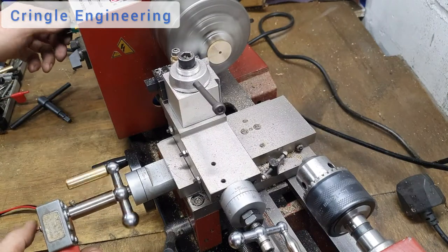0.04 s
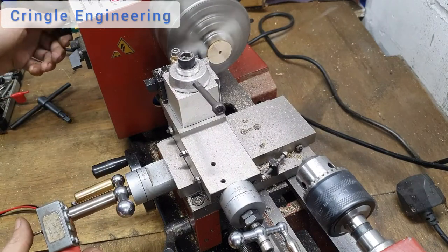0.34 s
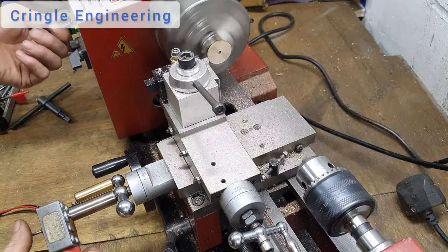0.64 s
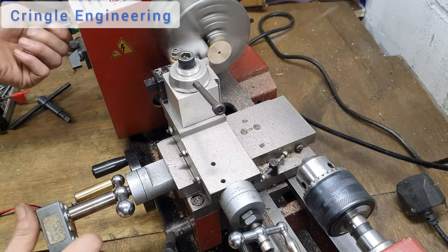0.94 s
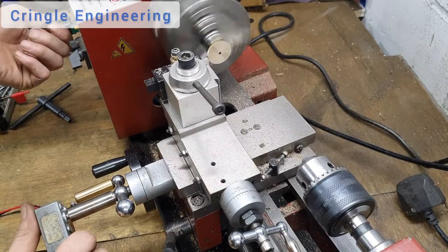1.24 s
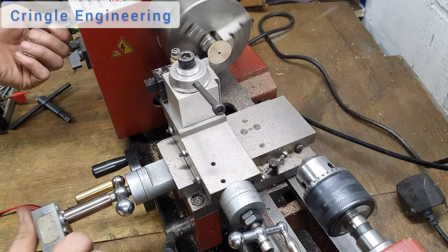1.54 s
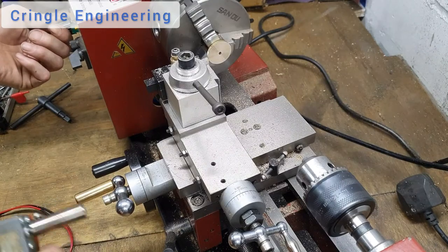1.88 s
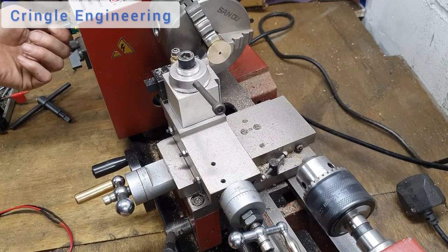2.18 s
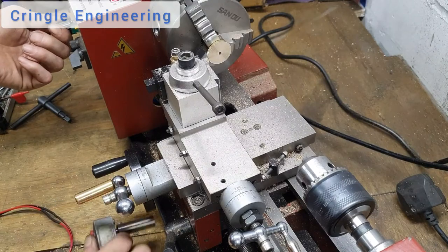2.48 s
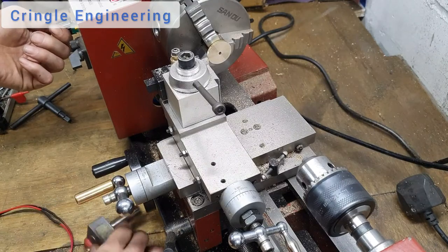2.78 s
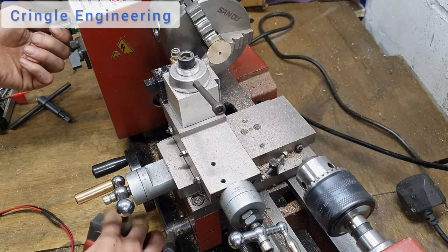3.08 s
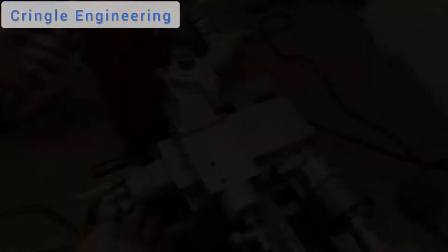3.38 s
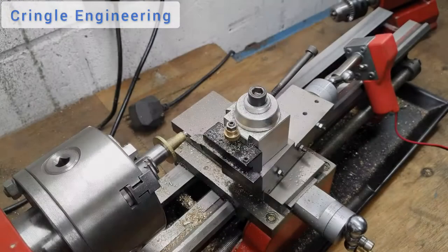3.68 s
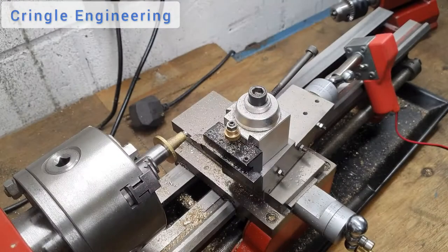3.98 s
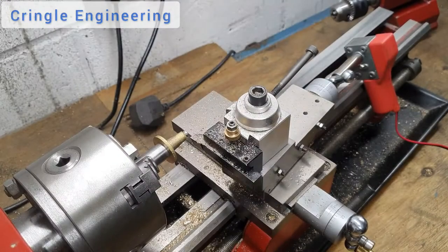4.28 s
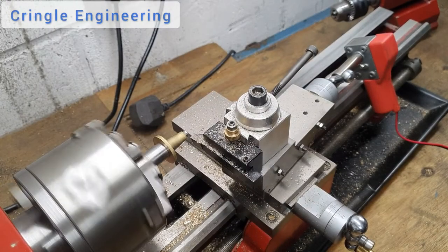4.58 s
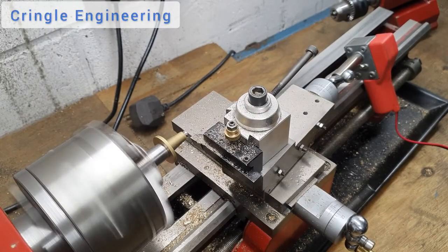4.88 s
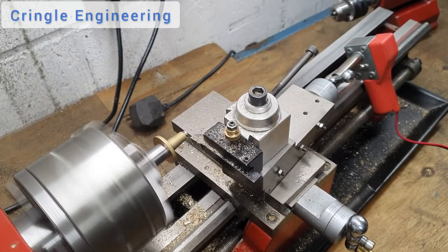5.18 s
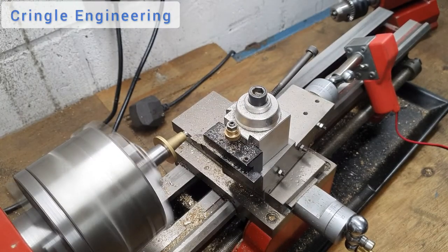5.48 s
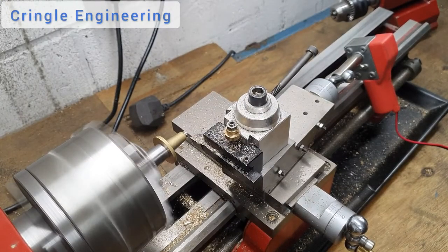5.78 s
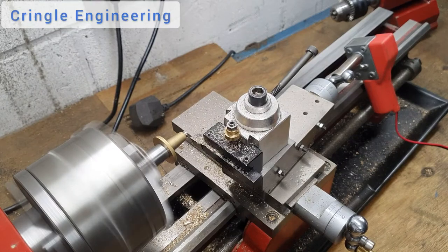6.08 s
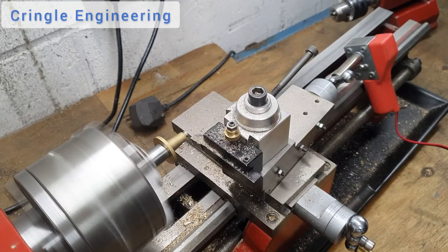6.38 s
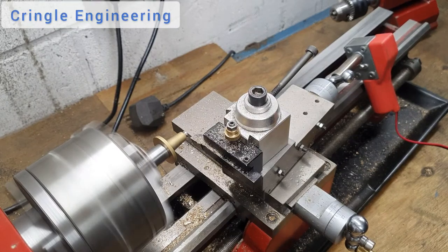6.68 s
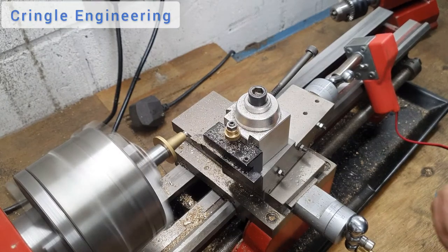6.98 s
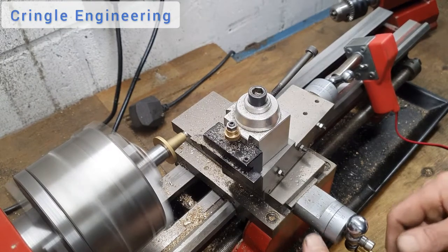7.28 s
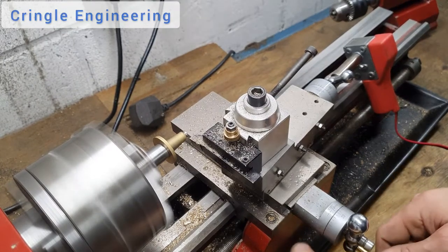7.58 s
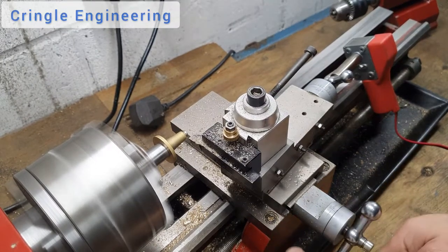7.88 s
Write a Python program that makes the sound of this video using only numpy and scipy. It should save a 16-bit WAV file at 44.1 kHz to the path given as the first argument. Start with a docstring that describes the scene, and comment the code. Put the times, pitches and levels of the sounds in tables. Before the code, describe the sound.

Close up in a workshop, the loose gears of a small lathe whirr and clack as they slow to rest. A tool thuds onto the wooden bench and is shoved along with faint squeaks. The sound dips away and returns, then the lathe starts with a click and a low electric hum, its gear whine climbing in stages and holding steady over a dense metallic rattle.

```python
"""The gear train of a small bench lathe coasts to rest, its teeth clacking across their backlash.
A tool is put down and shoved along the wooden bench. The sound fades out and in, now beside the
headstock: the switch snaps, the motor growls at twice mains frequency, and the gears speed up in steps.
Periodic tooth contact makes a steady whine; tooth impacts excite the housing into a dense rattle."""
import sys
import numpy as np
from scipy import signal
from scipy.fft import rfft, irfft, next_fast_len
from scipy.io import wavfile
from scipy.ndimage import uniform_filter1d, map_coordinates

SR = 44100
rng = np.random.default_rng(int(sys.argv[2]) if len(sys.argv) > 2 else 0)


def wav_record(signal):
    """Record a signal, one row per channel, as 16-bit PCM in the file named by sys.argv[1]."""
    frames = np.transpose(np.atleast_2d(signal))
    bounded = np.clip(frames, -1, 1)
    # unit amplitude maps onto the largest positive 16-bit level
    quanta = np.round(bounded * 32767).astype(np.int16)
    wavfile.write(sys.argv[1], SR, quanta)


N = 354563
TIME = np.arange(N) / SR
TEETH = 30
ON_S, MOVE_S = 4.478, 3.386  # the switch closes; the listener moves from tool post to headstock

def amp(db):
    """Decibels as an amplitude ratio."""
    return 10 ** (np.asarray(db) / 20)

def unit(x):
    """Normalisation: the mean of the channels gets rms 1."""
    return x / np.sqrt(np.mean(np.atleast_2d(x).mean(0) ** 2) + 1e-20)

def along(points, hz):
    """Interpolation of (Hz, value) points on a log frequency axis."""
    freqs, values = np.transpose(points)
    return np.interp(np.log(hz + 1), np.log(freqs + 1), values)

def noise():
    """Two uncorrelated white noises."""
    return rng.standard_normal((2, N))

def wobble(rate):
    """Smooth random modulation with rate knots a second."""
    coarse = TIME[::16]
    knots = rng.standard_normal(int(N * rate / SR) + 4)
    return np.interp(TIME, coarse, map_coordinates(knots, [coarse * rate]))

def wavering(hz, depth, rate, start=0):
    """A sine with random phase modulation, depth in radians."""
    return np.sin(2 * np.pi * hz * (TIME - start) + depth * wobble(rate))

def dying(s, db, t60):
    """Exponential decay after a blow."""
    return amp(db - 60 * np.abs(TIME - s) / t60) * np.clip((TIME - s) / 0.0026, 0, 1)

def swell(s, db, half):
    """A Gaussian rise and fall."""
    return amp(db) * np.exp(-.5 * ((TIME - s) / half) ** 2)

def filtered(x, response):
    """Linear filtering: the spectrum times a frequency response."""
    size = next_fast_len(N + SR // 2)
    return irfft(rfft(x, size) * response(np.fft.rfftfreq(size, 1 / SR)), size)[..., :N]

def dulled(x, edge_hz):
    """Low-pass filtering, 36 dB an octave."""
    return filtered(x, lambda hz: 1 / (1 + (hz / edge_hz) ** 6))

def gain(spectrum, modes, hz):
    """Resonance: each mode adds a Lorentzian peak or dip in dB to a broad spectrum."""
    lift_db = sum(db / (1 + ((hz - centre) / (width / 2)) ** 2) for centre, width, db in modes)
    return amp(along(spectrum, hz) + lift_db)

# Stereo images, two lists each. Each row of the first: frequency in Hz, left minus right in dB.
# Each row of the second: frequency in Hz, coherence from 0 to 1.
AT_TOOL_POST = ([(100, -0.5), (500, 0.5), (1000, -5), (2400, -9), (6000, -22), (8000, -32), (12000, -13)],
                 [(100, .99), (300, 1), (1000, 0.2), (3000, 0.073)])
AT_HEADSTOCK = ([(100, -2), (250, -2.5), (600, -2), (1000, 1), (1250, -8), (1800, -5), (2100, -9),
                 (2700, -7.5), (4200, -12.5), (6300, -20.5), (8000, -21), (9200, -20), (11500, -8.5),
                 (15000, -17)], [(100, 0.38), (300, 0.91), (600, 0.37), (1200, 0.035), (2500, 0.037)])
CENTRED = ([(100, 0.0034), (5000, 0.008)], [(100, 0.99), (500, 0.63), (2000, 0.14), (6000, .2)])
def heard(pair, spectrum, place, modes=()):
    """Partial coherence: two unrelated signals are coloured and blended into left and right."""
    balance, coherence = place
    def blend(hz):
        angle = np.arccos(np.clip(along(coherence, hz), 0, 1)) / 2
        return gain(spectrum, modes, hz) * np.array([np.cos(angle), np.sin(angle)])
    def lean(hz):
        left = amp(along(balance, hz))
        middle = np.sqrt(1 + left ** 2 + 2 * left * np.clip(along(coherence, hz), 0, 1))
        return np.array([left, np.ones_like(left)]) / middle
    mid, side = filtered(pair, blend)
    return unit(filtered(np.array([mid + side, mid - side]), lean))

def from_right(pair, lag_ms=0.31):
    """Path difference: sound from the right reaches the left channel later."""
    return filtered(pair, lambda hz: np.exp(-2j * np.pi * hz * np.array([[lag_ms / 1000], [0]])))

def strikes(cycles, sizes, scatter):
    """An impulse train: one blow a cycle, jittered by a share of a cycle."""
    k = np.arange(1, int(cycles[-1]))
    at = np.interp(k + scatter * rng.standard_normal(len(k)), cycles, np.arange(N))
    return np.bincount(at.astype(int), sizes(k), N)[:N]

def uneven(k, spread_db):
    """Log-normal strengths for the blows k, limited to two deviations."""
    return amp(spread_db * np.clip(rng.standard_normal(len(k)), -2, 2))

def ringing(blows, t60, spots=5):
    """Convolution: each spot struck has its own impulse response, a dense cluster of modes."""
    t = np.arange(SR // 8) / SR
    spot = rng.integers(spots, size=N)
    paths = rng.standard_normal((spots, 2, len(t))) * amp(-60 * t / t60)
    return unit(sum(signal.oaconvolve((blows * (spot == k))[None], paths[k], axes=1)[:, :N]
                    for k in range(spots)))

# Room air, one spectrum for each listening position. Each row: frequency in Hz, relative level in dB.
AIR_SPECTRA = ([(80, -6), (140, 2), (200, 3.5), (300, -3.5), (400, 1.5), (620, -10), (1030, -14),
               (2000, -22.5), (3500, -29), (6300, -40.5), (7500, -58), (15000, -60)], [(90, -2.5),
               (165, -6), (200, -1.5), (330, 0), (450, -0.5), (620, -13.5), (950, -13.5), (2000, -22.5),
               (3500, -30), (4500, -37.5), (6300, -40.5), (7500, -62), (15000, -63)])
def room_air():
    """Ambient noise: a steady hiss at the tool post, then another beside the headstock."""
    levels = (TIME < MOVE_S) * amp(-47.5), (TIME >= MOVE_S) * amp(-49.5)
    return sum(level * heard(noise(), colour, CENTRED) for level, colour in zip(levels, AIR_SPECTRA))

# The rumble's spectrum. Each row: frequency in Hz, relative level in dB.
RUMBLE_SPECTRUM = [(20, -12), (40, -16.5), (62, 5.5), (80, -0.5), (100, 1.5), (116, -7.5), (135, -25.5),
                   (200, -49), (400, -74.5)]
# Its swells. Each row: centre in seconds, level in dB, half length in seconds.
RUMBLE_SWELLS = [(1.302, -44, 0.42), (2.427, -39.5, 0.17), (4.046, -41, 0.52), (4.95, -36.5, 0.37)]
def bench_rumble(rest_db=-45, shake_db=-54.5):
    """Structure-borne sound: the motor's shaking adds in power to a low rumble in the bench."""
    shake = amp(shake_db) * motor_load() ** 1.3
    level = np.sqrt(amp(rest_db) ** 2 + shake ** 2 + sum(swell(*row) ** 2 for row in RUMBLE_SWELLS))
    return level * amp(1.1 * wobble(4.02)) * heard(noise(), RUMBLE_SPECTRUM, CENTRED)

# Modes of a hollow object. Each row: frequency in Hz, level in dB, 60 dB decay time in seconds.
HOLLOW_MODES = [(482, -35, .2), (590, -39, .16), (704, -34, 0.098), (875, -42, .08)]
def hollow_knock(s=3.058):
    """Free vibration: something hollow is bumped and its damped modes ring briefly."""
    return sum(dying(s, db, t60) * wavering(hz, 0.47, 120, start=s) for hz, db, t60 in HOLLOW_MODES)

# Blows on the bench. Each row: start in seconds, level in dB, main mode in Hz, relative click in dB.
TOOL_BLOWS = [(2.64, -20.5, 285, -18), (2.667, -17.5, 231.7, -13), (2.689, -18, 148, -28),
              (2.726, -30, 124, -31), (2.794, -31, 105, -9.5), (2.895, -31, 158, -17),
              (2.959, -30, 138, -20), (3.1, -33.5, 258, -28), (3.143, -40, 342, -15)]
# The click's spectrum. Each row: frequency in Hz, relative level in dB.
CLICK_SPECTRUM = [(150, -8), (500, 12), (1200, 7.5), (2800, 0.5), (4500, -14), (6700, -22), (7600, -31),
                  (15000, -43)]
def tool_knocks(t60=0.18, side_modes_db=-8.0):
    """Impact excitation: each blow of the tool gives a hard click and a thud from the boards' modes."""
    thud, click = np.zeros(N), np.zeros(N)
    for s, db, hz, click_db in TOOL_BLOWS:
        phase = 2 * np.pi * hz * (TIME - s)
        side_modes = amp(side_modes_db) * (np.sin(1.37 * phase) + np.sin(0.6 * phase))
        thud += dying(s, db, t60) * (np.sin(phase) + side_modes)
        click += dying(s, db + click_db, t60=0.084)
    return thud + click * heard(noise(), CLICK_SPECTRUM, AT_TOOL_POST)

# Shoves of the tool. Each row: centre in seconds, level in dB, half length in seconds.
TOOL_SHOVES = [(2.42, -49.5, 0.18), (2.75, -41, 0.06), (2.95, -41, 0.043), (3.227, -43, 0.13)]
# The scrape's spectrum. Each row: frequency in Hz, relative level in dB.
SCRAPE_SPECTRUM = [(70, -24), (150, 13), (300, 11), (600, -3), (1200, -6), (1550, -7), (1850, -9),
                   (2300, -10.5), (4000, -16.5), (6500, -22), (7600, -35.5), (12000, -36), (15500, -54)]
# The tool's resonances. Each row: frequency in Hz, width in Hz, gain in dB.
TOOL_MODES = [(1630, 49, 9), (1990, 46, 6)]
# Squeaks. Each row: centre in seconds, level in dB, half length in seconds, pitch in Hz.
TOOL_SQUEAKS = [(2.925, -42, 0.018, 2040), (2.971, -44, .012, 1685), (2.8, -42, 0.008, 1230)]
def tool_slide():
    """Sliding friction: the tool scrapes, rings and squeaks along the wood."""
    level = sum(swell(*row) for row in TOOL_SHOVES) * amp(2.0 * wobble(70))
    scrape = level * heard(noise(), SCRAPE_SPECTRUM, AT_TOOL_POST, TOOL_MODES)
    return scrape + sum(swell(s, db, half) * wavering(hz, 0.6, 90) for s, db, half, hz in TOOL_SQUEAKS)

# A clunk and a snap. Each row: start in seconds, level in dB, 60 dB decay time in seconds,
# spectrum as pairs of frequency in Hz and relative level in dB.
SWITCH_BLOWS = [(4.477, -30, 0.29, [(200, -14), (600, -4), (1150, 0), (1700, -11), (3000, -20), (6300, -29),
                (7500, -38), (15000, -48)]), (4.503, -34, 0.098, [(500, -8), (2000, -5), (6300, 2),
                (7500, -21), (15000, -18)])]
def switch():
    """Impact transients: the drive engages with two decaying bursts of noise."""
    return sum(dying(s, db, t60) * heard(noise(), colour, AT_HEADSTOCK)
               for s, db, t60, colour in SWITCH_BLOWS)

# Turns of the speed knob. Each row: start in seconds, length in seconds, meshing rate reached in Hz.
KNOB_TURNS = [(4.46, .265, 298), (4.82, .2, 335), (5.02, .425, 491), (5.82, .49, 590.6)]
def driven_speed(inertia_s=.12):
    """Meshing rate in Hz: the chuck's inertia rounds off each ramp to a new speed."""
    mesh, before = np.zeros(N), 0
    for s, length, hz in KNOB_TURNS:
        mesh += (hz - before) * np.clip((TIME - s) / length, 0, 1)
        before = hz
    return np.abs(uniform_filter1d(mesh, int(inertia_s * SR)))

def motor_load(doubling_hz_per_s=225):
    """Inertial load: 0 with the power off, 1 at steady speed, more while the chuck accelerates."""
    acceleration = np.abs(np.gradient(driven_speed(), TIME))
    return np.clip((TIME - ON_S) / 0.063, 0, 1) * (1 + acceleration / doubling_hz_per_s)

RIPPLE_HZ = 100.2  # twice mains frequency
# The growl's spectrum. Each row: frequency in Hz, relative level in dB.
GROWL_SPECTRUM = [(70, -22), (100, -5), (150, -20), (205, 3.5), (250, -5), (310, 4.5), (420, -1.5),
                  (500, 4), (700, -4.5), (1050, -3.5), (1500, -21.5), (3000, -29), (6000, -48),
                  (8000, -54.5)]
# Hum. Each entry: rms level in dB at steady speed of the next harmonic of the ripple.
HUM_HARMONICS = [-45.5, -49, -50.5, -67]
def motor(growl_db=-41, beat_hz=88.1, beat_db=-36):
    """Forced vibration: the speed control kicks the motor on each half wave of the mains."""
    load = motor_load()
    pulses = strikes(TIME * RIPPLE_HZ, lambda k: amp(rng.normal(0, 2.4, len(k))), scatter=.006)
    kicks = ringing(pulses, t60=0.042, spots=2)
    growl = amp(growl_db) * load * heard(kicks + 0.92 * noise(), GROWL_SPECTRUM, AT_HEADSTOCK)
    # the motor strains as the chuck breaks loose
    strain = swell(s=4.585, db=-27.5, half=0.03) * heard(noise(), GROWL_SPECTRUM, AT_HEADSTOCK)
    hum = sum(np.sqrt(2) * amp(db + 1.2 * wobble(6)) * wavering(k * RIPPLE_HZ, 0.85, 14)
              for k, db in enumerate(HUM_HARMONICS, 1))
    # a low tone beats with the hum during acceleration
    beat = np.clip(load - 1, 0, 1) * amp(beat_db) * wavering(beat_hz, 0.77, 5)
    return growl + strain + load ** 0.44 * hum + beat

def impact(mesh, knee_hz, steep):
    """Saturation: teeth strike harder with speed, the gain levelling off at 1 above the knee."""
    return 1 - 1 / (1 + (mesh / knee_hz) ** steep)

def shaft_turns(mesh):
    """Rotation is the integral of speed: one turn for every TEETH meshings."""
    return np.cumsum(mesh) / SR / TEETH

def rattle(mesh, worn, scatter, t60, rolling):
    """Tooth impacts: worn teeth strike alike each turn, loose ones by chance, over a rolling hiss."""
    cycles = np.cumsum(mesh) / SR
    wear = rng.uniform(-0.91, 1, TEETH)
    regular = ringing(strikes(cycles, lambda k: wear[k % TEETH], scatter=.02), t60, spots=1)
    loose = strikes(cycles, lambda k: uneven(k, spread_db=3.5) * rng.choice([-1, 1], len(k)), scatter)
    return worn * regular + ringing(loose, t60) + rolling * noise()

def whine(mesh, spectrum, modes, place, runout, lobes, flutter, sway_db, rough, fall_db, count):
    """Modulation: harmonics of the meshing rate gain sidebands from imperfect gears."""
    angle = 2 * np.pi * shaft_turns(mesh)
    smear = 0.138 * (mesh / KNOB_TURNS[-1][2]) ** 4 * wobble(70)  # high overtones blur at speed
    phase = TEETH * angle + flutter * wobble(25)
    out = np.zeros(N)
    for k in range(1, count + 1):
        a, b, c = rng.uniform(0, 2 * np.pi, 3)
        runout_swing = runout * np.sqrt(k) * np.sin(angle + a)
        tone = np.sin(k * (phase + (k - 1) * smear) + runout_swing)
        out_of_round = 1 + lobes * (np.sin(2 * angle + b) + np.sin(3 * angle + c))
        tooth_bounce = 1 + rough * min(k - .5, 1.5) * wobble(90)
        level = np.sqrt(2) * amp(sway_db * wobble(24) - fall_db * np.log2(k))
        out += level * out_of_round * tooth_bounce * tone
    def housing(hz):
        left = amp(along(place[0], hz))
        return gain(spectrum, modes, hz) * np.array([left, np.ones_like(left)]) * 2 / (1 + left)
    return filtered(out, housing)

# Flares of the falling whine. Each row: centre in seconds, level in dB, pitch in Hz.
WHINE_FLARES = [(.4, -30, 1025), (.45, -35.5, 336.4), (.53, -35.5, 652), (.69, -34, 1080), (.83, -30, 448),
                (.96, -34, 435), (1.05, -38, 1060), (1.065, -34, 350), (1.47, -37, 194)]
def whine_flares():
    """Resonance: short hollow tones flare up as the falling gear whine passes through resonances."""
    return sum(swell(s, db, half=0.016) * wavering(hz, 1.06, 54.1) for s, db, hz in WHINE_FLARES)

# The rub's spectrum. Each row: frequency in Hz, relative level in dB.
RUB_SPECTRUM = [(1000, -100), (1550, -20), (1790, 0), (2050, -20), (3000, -100)]
def rub():
    """Friction noise: a faint narrow band in the last turns before rest."""
    return swell(s=1.36, db=-50.5, half=.1) * heard(noise(), RUB_SPECTRUM, AT_TOOL_POST)

# Bursts of gear chatter. Each row: centre in seconds, level in dB, half length in seconds.
CHATTER_BURSTS = [(0.005, -27.5, 0.0085), (0.083, -36.5, 0.01), (0.118, -41.5, 0.0066), (0.138, -40, 0.009),
                  (0.199, -42, 0.011), (0.251, -38, 0.011), (0.3, -40.5, 0.013), (0.398, -36, 0.011),
                  (0.436, -43, 0.0064), (.486, -46.5, .006), (0.523, -39.5, 0.016), (0.619, -39.5, 0.0067),
                  (0.675, -45, .007), (0.716, -41, 0.011), (0.813, -37, 0.0097), (0.875, -41, 0.0092),
                  (0.962, -39.5, 0.018), (1.027, -40.5, 0.014), (1.07, -43.5, 0.012), (1.13, -42, 0.015),
                  (1.164, -44.5, .006), (1.211, -42, 0.014), (1.335, -47.5, 0.0066), (1.367, -49, 0.015)]
def clinks(count=12, low_hz=950, high_hz=4800, boost_db=6, t60=.09):
    """Modal ringing: each burst knocks a different part of the gear train, with modes of its own."""
    out, t = np.zeros((2, N)), np.arange(SR // 6) / SR
    for s, db, half in CHATTER_BURSTS:
        hz = np.exp(rng.uniform(np.log(low_hz), np.log(high_hz), (count, 1)))
        age = np.clip(t - rng.uniform(0, 2 * half, (count, 1)), 0, None)
        decay = amp(db + boost_db - 3.7 * np.log2(hz / low_hz) - 60 * age / t60)
        ring = decay * (1 - np.exp(-age / 0.0053)) * np.sin(2 * np.pi * hz * age)
        left = ring * amp(along(AT_TOOL_POST[0], hz))
        start = int(max(s - 1.3 * half, 0) * SR)
        out[:, start:start + len(t)] += np.array([left.sum(0), ring.sum(0)])
    return out

def coasting_speed(stop_s=1.78, friction_hz_per_s=258, drop_hz=52.2, drop_s=.07):
    """Meshing rate in Hz: constant friction slows the gears evenly, after a brief sharper drop."""
    return friction_hz_per_s * np.clip(stop_s - TIME, 0, None) + drop_hz * np.exp(-TIME / drop_s)

# Spectra of the unloaded rattle and whine. Each row: frequency in Hz, relative level in dB.
LOOSE_SPECTRUM = [(150, -22), (240, -10), (330, 4), (430, 2), (570, -4.5), (760, 2), (880, -2.5),
                  (1050, 1.5), (1350, -6), (1830, -1), (2250, -5), (2750, -5.5), (3400, -8), (4250, -8.5),
                  (5200, -11), (6400, -12.5), (7500, -28), (10500, -25.5), (15500, -35)]
COAST_WHINE_SPECTRUM = [(170, -51), (230, -42), (290, -55), (350, -40), (430, -46), (510, -30), (570, -49),
                        (660, -35), (820, -29.5), (1000, -32)]
# Resonances of the loose gears. Each row: frequency in Hz, width in Hz, gain in dB.
GEAR_MODES = [(1038, 70, 7), (1825, 110, 6), (2230, 73, 3.5), (2880, 45, 7), (3240, 500, -3),
              (3740, 110, 4), (4180, 160, 4.5)]
# Single teeth dropping across the backlash. Each row: start in seconds, level in dB,
# 60 dB decay time in seconds, treble edge in Hz.
TOOTH_TICKS = [(1.736, -45, 0.2, 3500), (1.796, -41.5, 0.14, 5530), (1.872, -40, 0.14, 6200),
               (1.909, -49, 0.21, 3200), (2.249, -44.5, 0.16, 2610)]
def coasting_gears(whirr_db=-44.5):
    """Backlash: unloaded teeth whirr down and chatter across their play, more dully as they slow."""
    mesh = coasting_speed()
    blows = rattle(mesh, worn=0.87, scatter=.25, t60=0.098, rolling=1.0)
    teeth = heard(blows, LOOSE_SPECTRUM, AT_TOOL_POST, GEAR_MODES)
    dull = dulled(teeth, edge_hz=4700)
    treble = np.clip(mesh / 400, 0, 1) ** 1.8 * (teeth - dull)
    whirr = amp(whirr_db + 0.99 * wobble(44.06)) * impact(mesh, knee_hz=66, steep=1.36)
    level = np.sqrt(whirr ** 2 + 0.77 * sum(swell(*row) ** 2 for row in CHATTER_BURSTS))
    steel = heard(noise(), LOOSE_SPECTRUM, AT_TOOL_POST, GEAR_MODES)
    ticks = sum(dying(s, db, t60) * dulled(steel, edge_hz) for s, db, t60, edge_hz in TOOTH_TICKS)
    flares = whine_flares()
    tone = whine(mesh, COAST_WHINE_SPECTRUM, (), AT_TOOL_POST, runout=0.45, lobes=0.19, flutter=1.7,
                 sway_db=3.0, rough=0.4, fall_db=18.5, count=2)
    return level * (dull + treble) + ticks + flares + np.clip(mesh / 130 - 1, 0, 1) * tone

# The gear cover's ring. Each row: frequency in Hz, relative level in dB.
COVER_SPECTRUM = [(2300, -67), (2540, -13), (2600, -1.5), (2660, -18), (2730, 0), (2800, -18), (3100, -65)]
def cover_ring(mesh, relative_db=-10.5):
    """Shock excitation: the cover is jolted unevenly about once a turn and rings in surges."""
    jolts = strikes(shaft_turns(mesh), lambda k: uneven(k, spread_db=1.0), scatter=.2)
    ring = ringing(jolts, t60=0.25)
    surges = amp(1.2 * wobble(17)) * heard(ring + .5 * noise(), COVER_SPECTRUM, AT_HEADSTOCK)
    return amp(relative_db) * impact(mesh, knee_hz=370, steep=8.7) * unit(surges)

# Spectra of the driven rattle and whine. Each row: frequency in Hz, relative level in dB.
RATTLE_SPECTRUM = [(120, -16), (230, -14.5), (330, -3), (420, -9.5), (800, 0), (1300, -2.5), (2100, -1),
                   (3200, 0.5), (4300, -7), (6400, -7.5), (7400, -25.5), (9800, -18.5), (13500, -28.5),
                   (15500, -50)]
WHINE_SPECTRUM = [(250, -34.5), (400, -32.5), (500, -26.5), (550, -30), (600, -34), (690, -25), (820, -27),
                  (950, -26), (1040, -32.5), (1180, -29), (1290, -38), (1500, -36), (1680, -37),
                  (1780, -39), (2000, -38.5), (2360, -39), (2700, -31.5), (3100, -40.5), (3800, -40.5),
                  (4500, -42.5), (7000, -58)]
# Resonances of the headstock. Each row: frequency in Hz, width in Hz, gain in dB.
HEADSTOCK_MODES = [(580, 293, 8.5), (832, 180, -7), (1034, 82, 10.5), (1141, 30, -3.5), (1253, 70, 7.5),
                   (1488, 58, 8.5), (1650, 72, 9), (1879, 75, 6.5), (2440, 140, 1), (2600, 39, 4),
                   (2700, 50, 6.5), (4640, 250, -1.5), (4770, 70, 3.5), (5173, 75, 10.5), (5297, 68, 6),
                   (5600, 130, -3), (5810, 150, 5.5), (6400, 67, 3.5), (7080, 110, 6), (12950, 180, 6)]
# Torque ripple pulses the rattle. Each row: rate as a share of the ripple rate, swing in dB.
TORQUE_PULSES = [(.5, 0.66), (1, 0.1)]
def driven_gears(rattle_db=-22):
    """Source and filter: loaded gears whine and rattle through the resonances of the headstock."""
    mesh = driven_speed()
    slack = np.clip(1 - mesh / mesh[-1], 0, .5)  # shortfall from full speed
    blows = rattle(mesh, worn=0.76, scatter=.15, t60=0.053, rolling=0.23)
    teeth = heard(blows, RATTLE_SPECTRUM, AT_HEADSTOCK, HEADSTOCK_MODES)
    teeth /= teeth[:, slack < .5].mean(0).std()
    # slow teeth strike softly and lack the top treble
    teeth -= np.clip(1.14 * slack, 0, 1) * (teeth - dulled(teeth, edge_hz=8500))
    torque_db = sum(db * np.sin(2 * np.pi * share * RIPPLE_HZ * TIME) for share, db in TORQUE_PULSES)
    ragged_db = 0.59 * wobble(6.7) + (0.5 + 0.39 * slack) * wobble(60)
    level = impact(mesh, knee_hz=256, steep=2.34) * amp(rattle_db + ragged_db + torque_db)
    # while gathering speed the whine is weaker, its level flickers and its high overtones stand out
    tone = whine(mesh, WHINE_SPECTRUM, HEADSTOCK_MODES, AT_HEADSTOCK, runout=0.46, lobes=0.26,
                 flutter=.06 + 0.13 * slack, sway_db=1.23 + 2.2 * slack, rough=0.22 + 0.17 * slack,
                 fall_db=-3.4 * slack, count=16)
    flicker = impact(mesh, knee_hz=246, steep=6.1) * amp(-slack * (15.0 + 8.4 * np.abs(wobble(60))))
    return (TIME > ON_S) * (level * (teeth + cover_ring(mesh)) + flicker * tone)

def scene():
    """Superposition: the lathe stops, a tool is put down and the lathe restarts, over rumble and air."""
    stopping = coasting_gears() + rub() + clinks()
    handling = hollow_knock() + tool_slide() + tool_knocks()
    running = switch() + motor() + driven_gears()
    return from_right(stopping + handling) + running + bench_rumble() + room_air()

def record(dry, fade_out_s=0.21, fade_in_s=0.5, top_hz=15650):
    """Attenuation and band limiting: the level dips between positions and the top treble is cut."""
    fader = np.clip(np.maximum((MOVE_S - TIME) / fade_out_s, (TIME - MOVE_S) / fade_in_s), .03, 1)
    return filtered(dry * fader, lambda hz: hz < top_hz)

dry = scene()
out = record(dry)
wav_record(out)
```